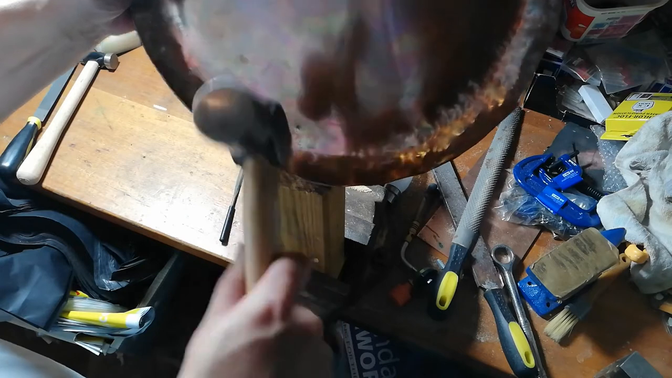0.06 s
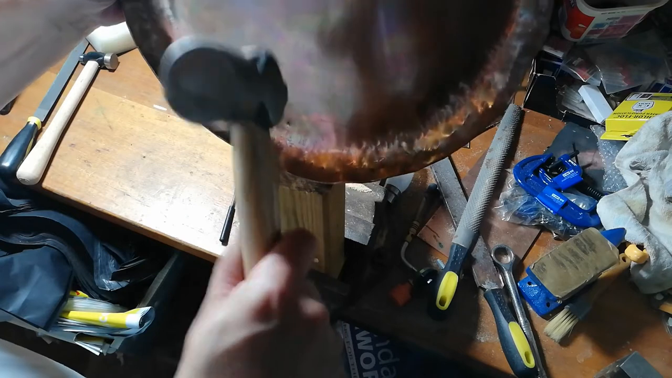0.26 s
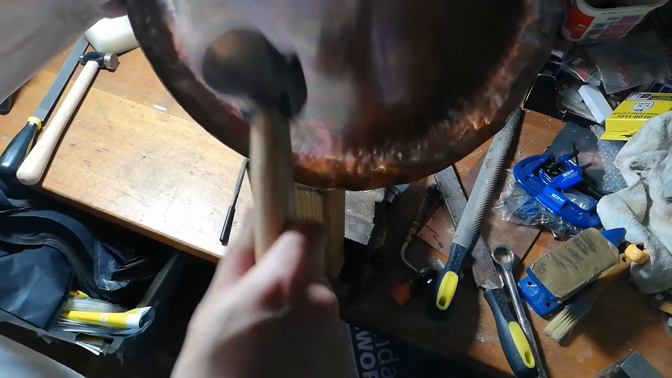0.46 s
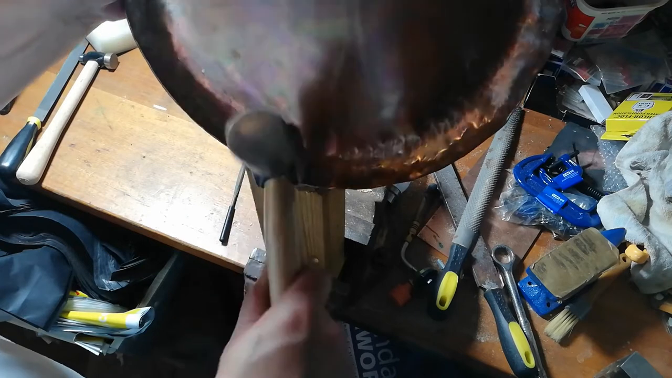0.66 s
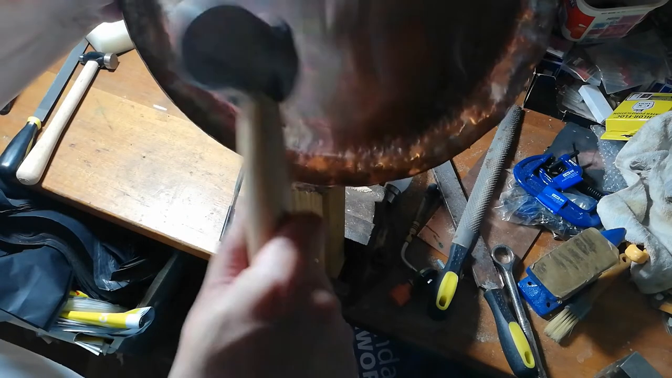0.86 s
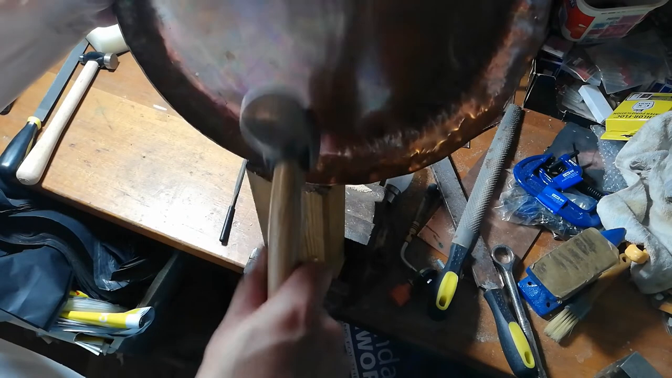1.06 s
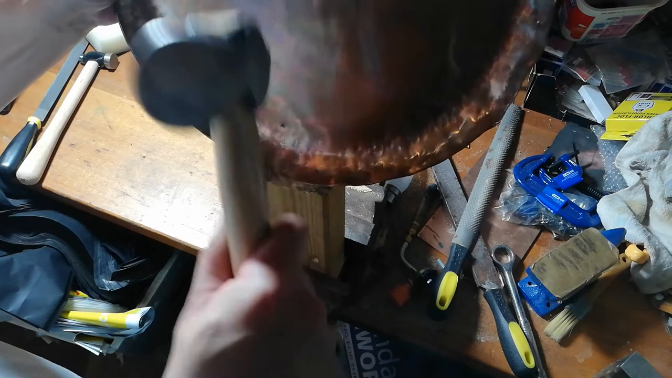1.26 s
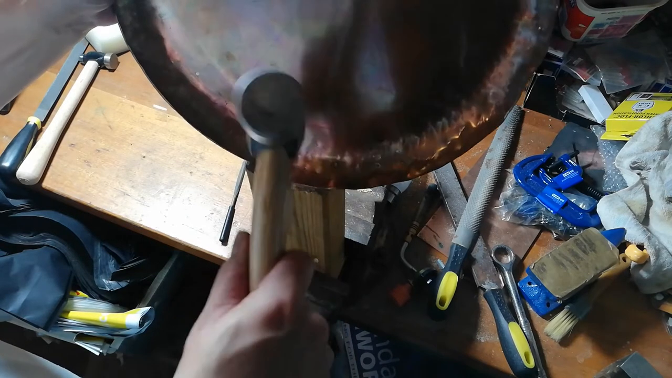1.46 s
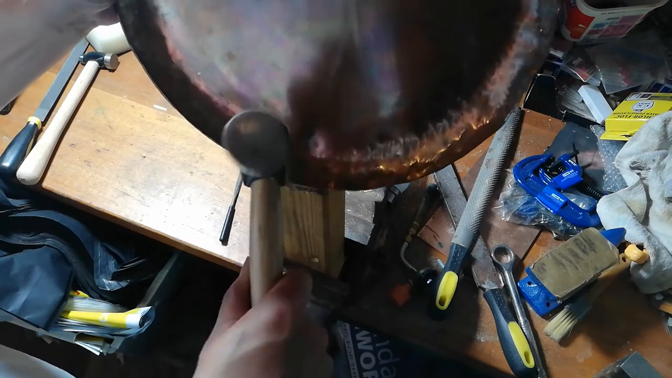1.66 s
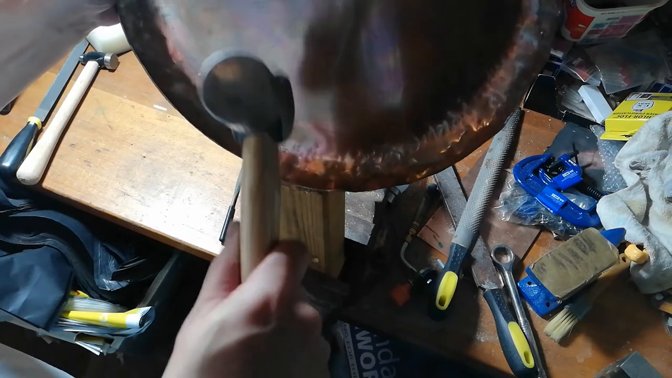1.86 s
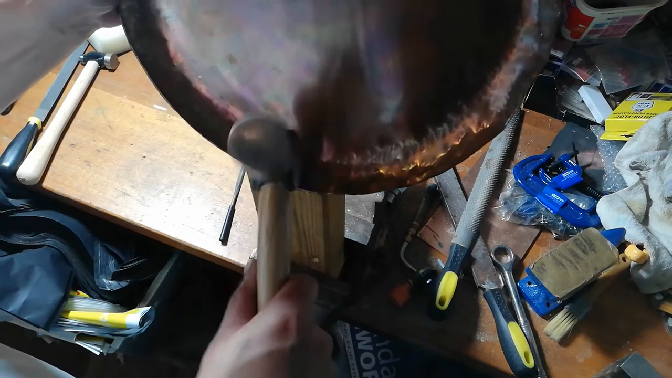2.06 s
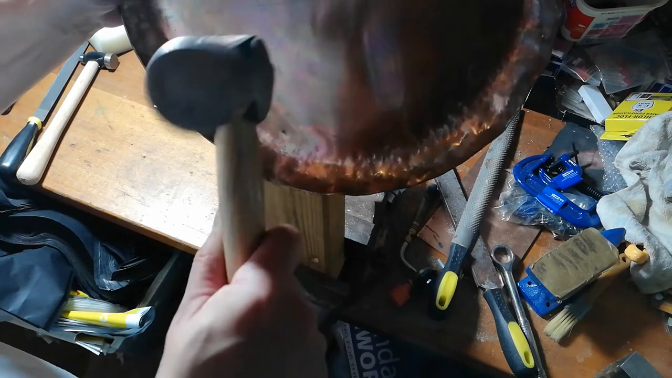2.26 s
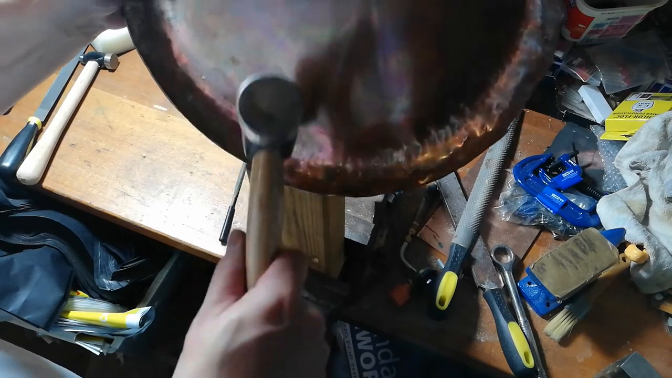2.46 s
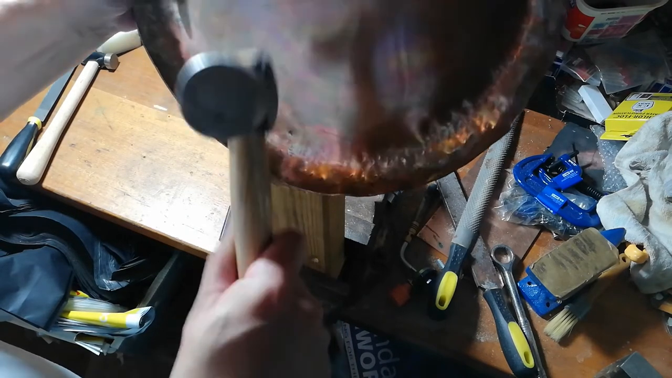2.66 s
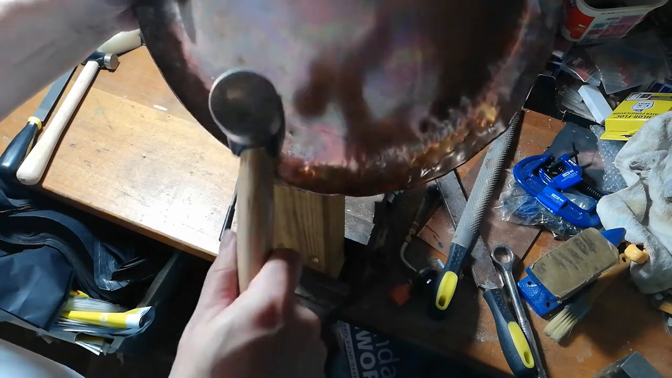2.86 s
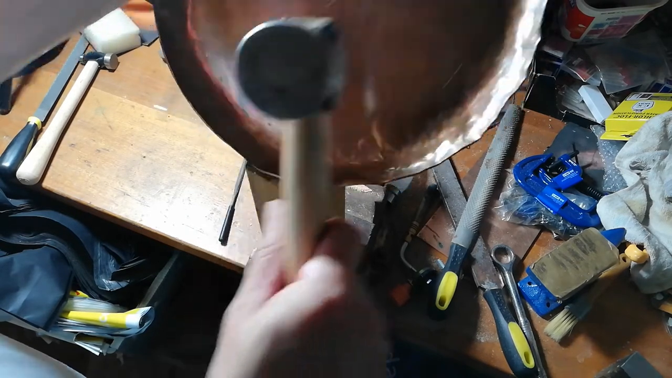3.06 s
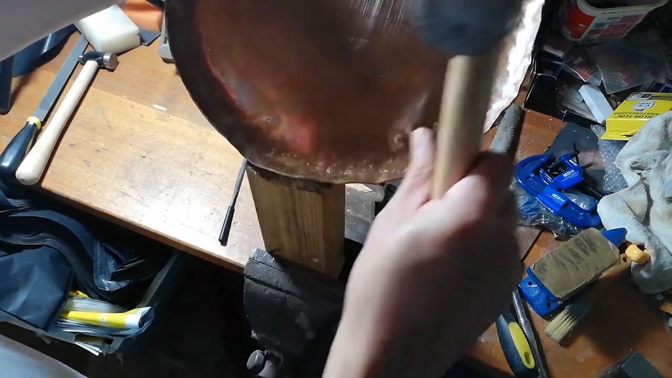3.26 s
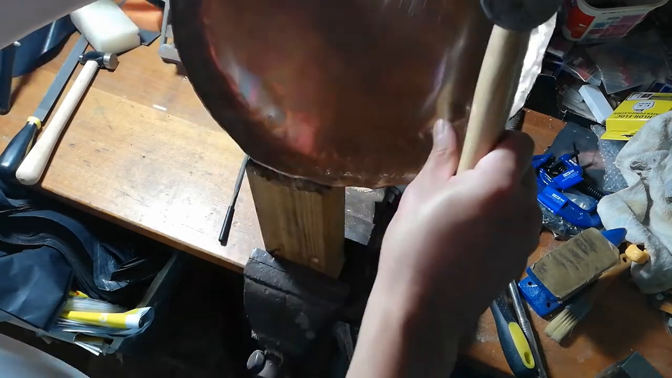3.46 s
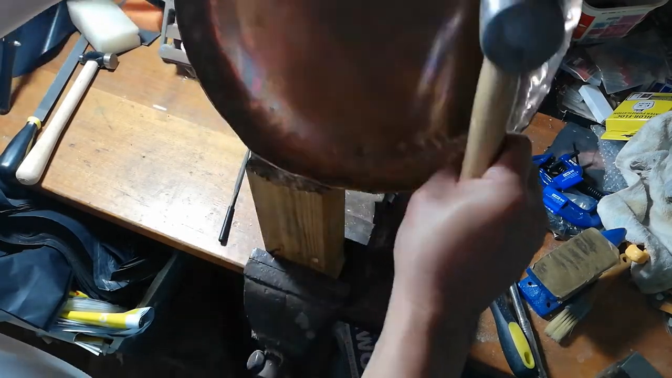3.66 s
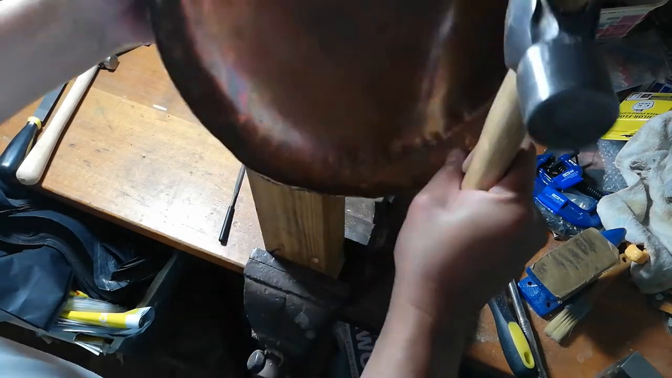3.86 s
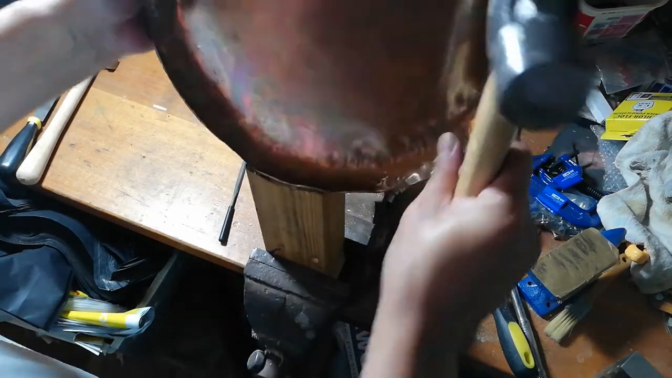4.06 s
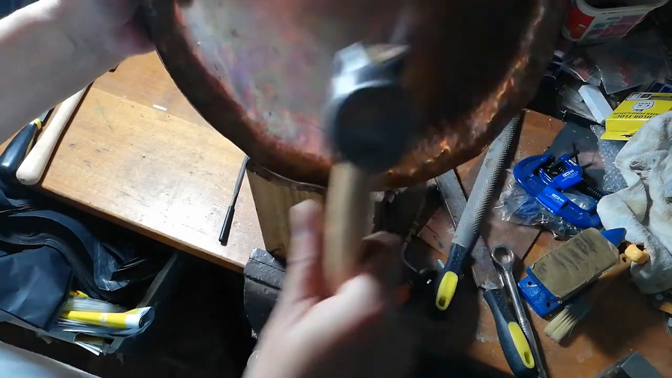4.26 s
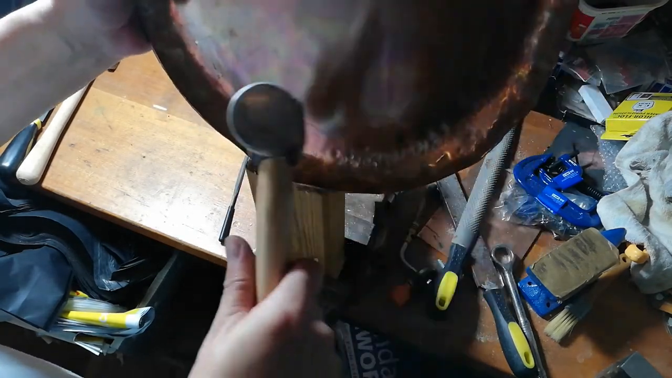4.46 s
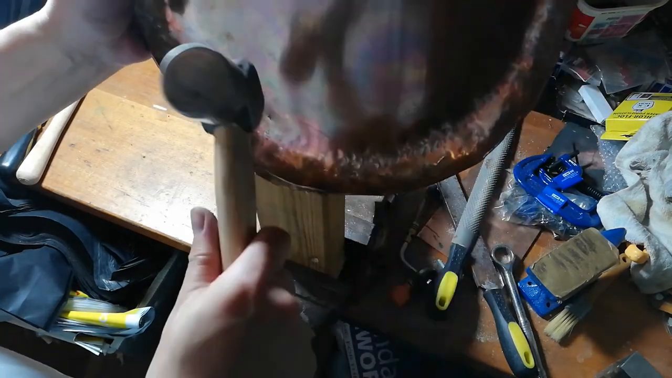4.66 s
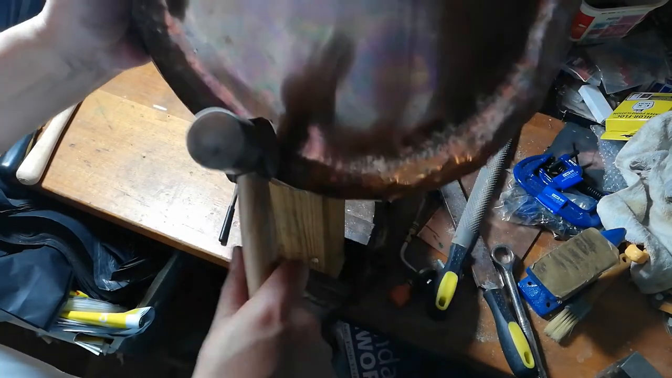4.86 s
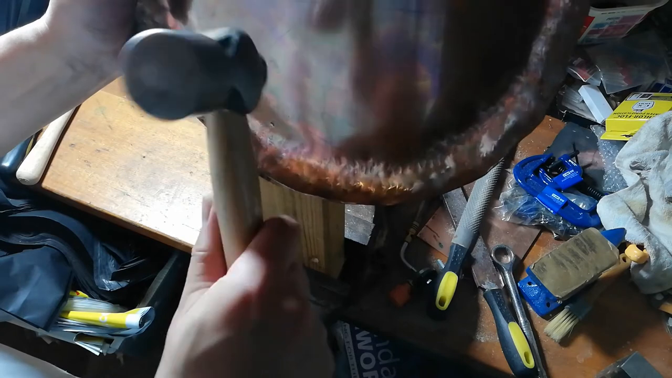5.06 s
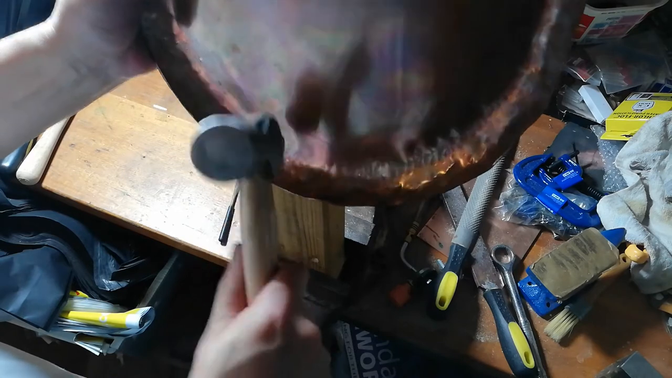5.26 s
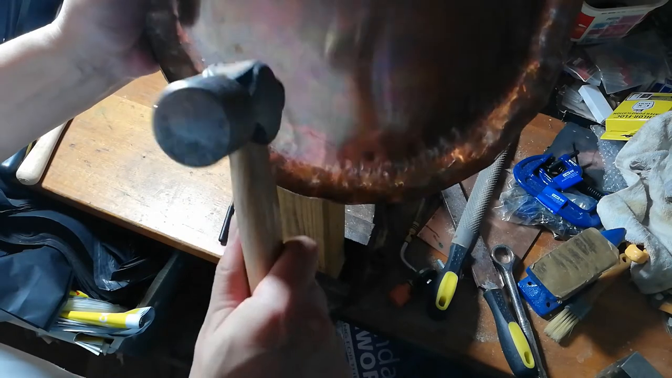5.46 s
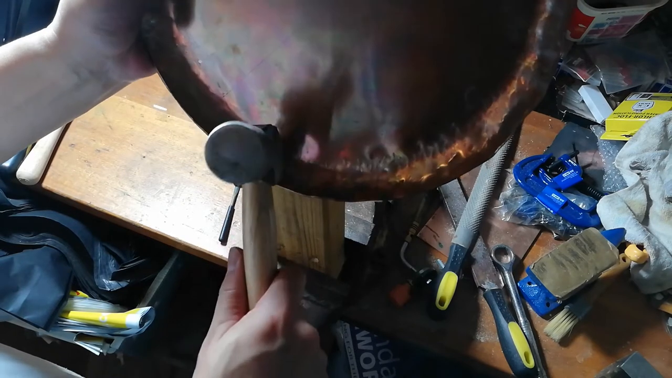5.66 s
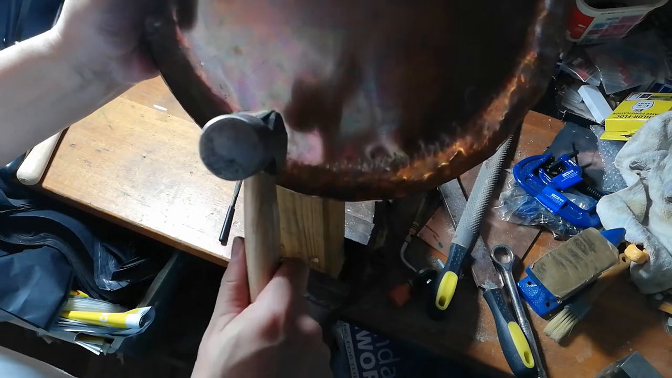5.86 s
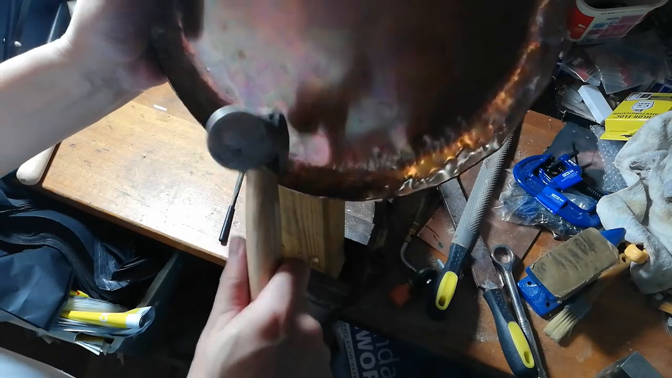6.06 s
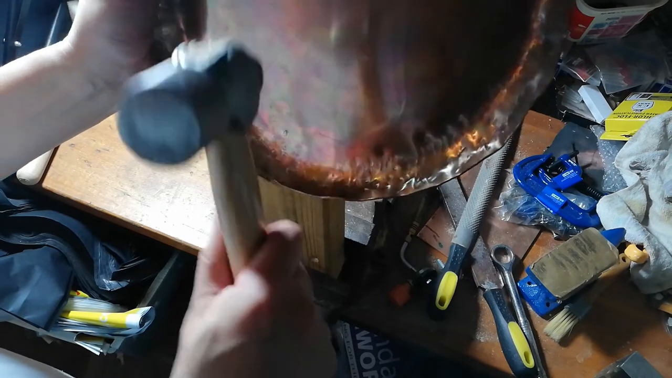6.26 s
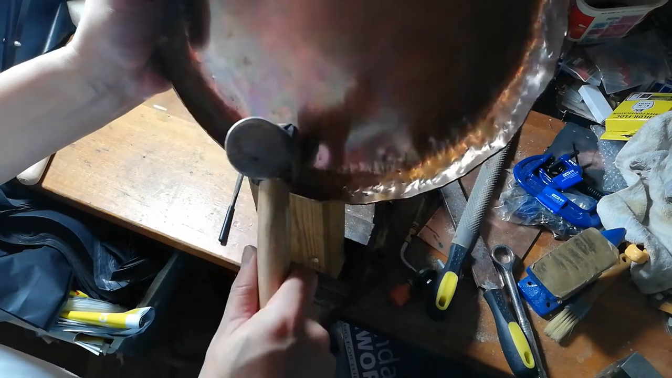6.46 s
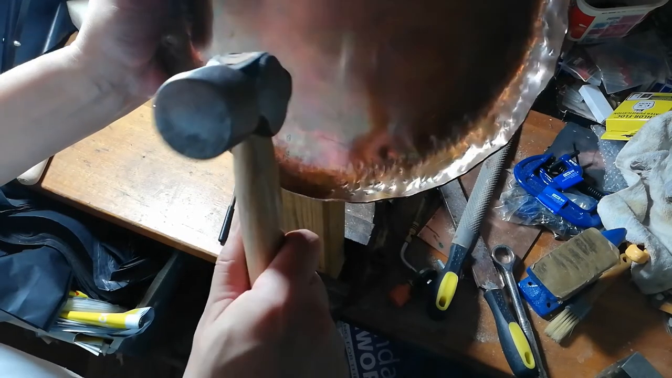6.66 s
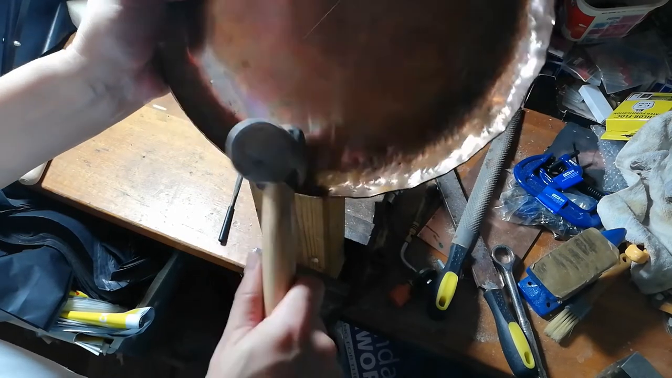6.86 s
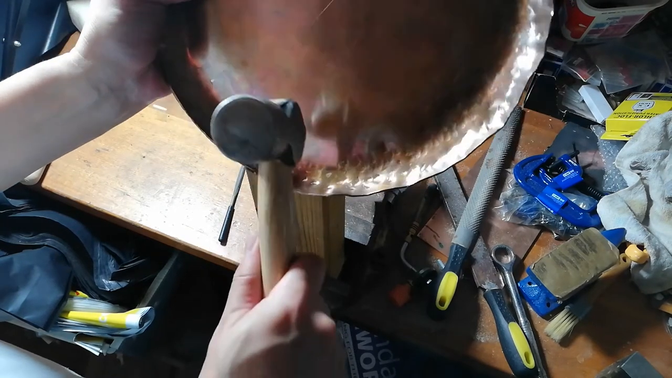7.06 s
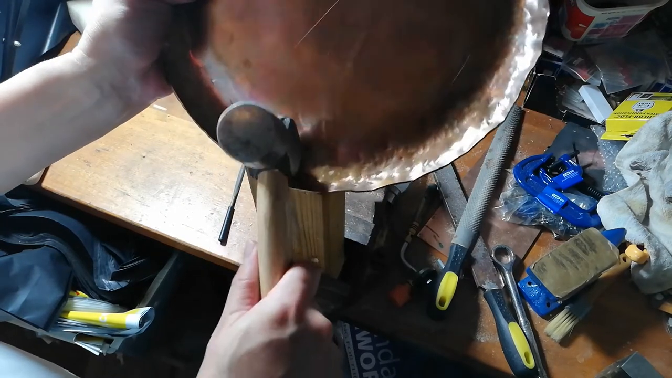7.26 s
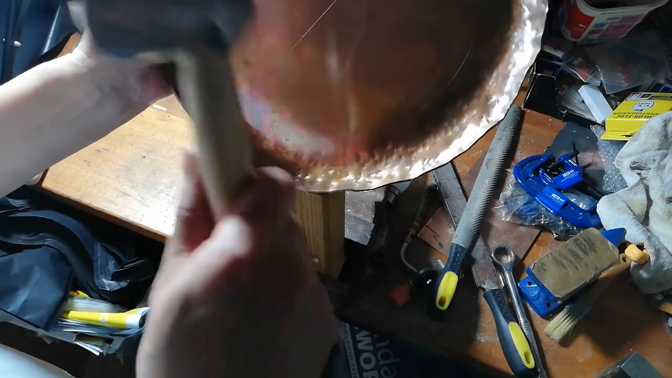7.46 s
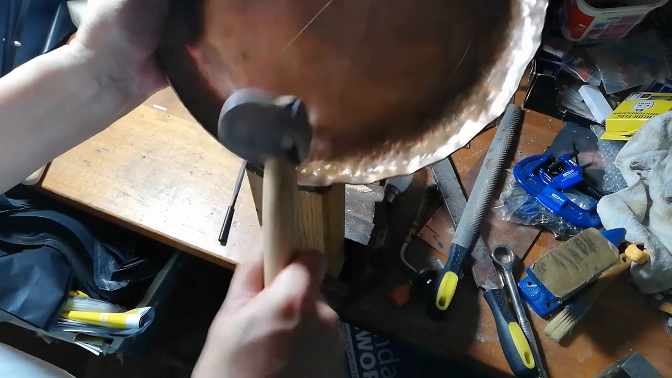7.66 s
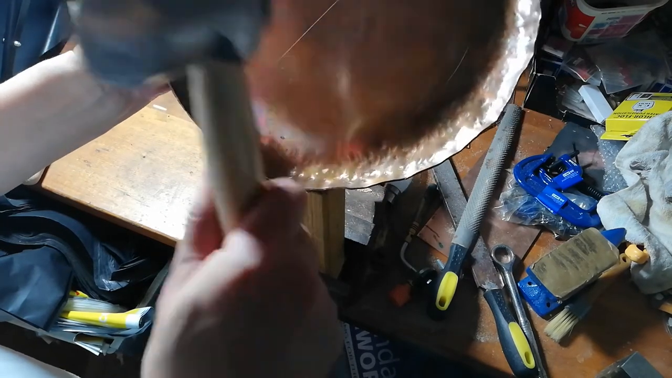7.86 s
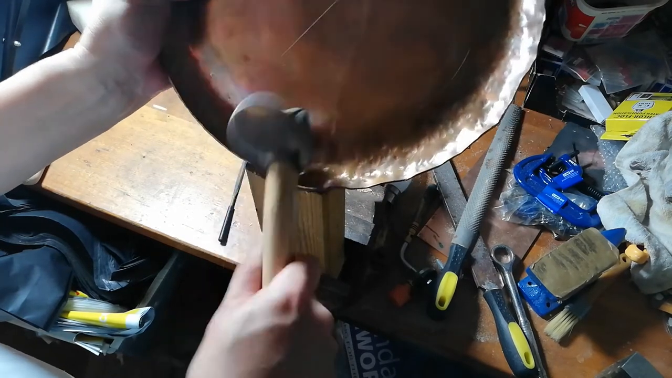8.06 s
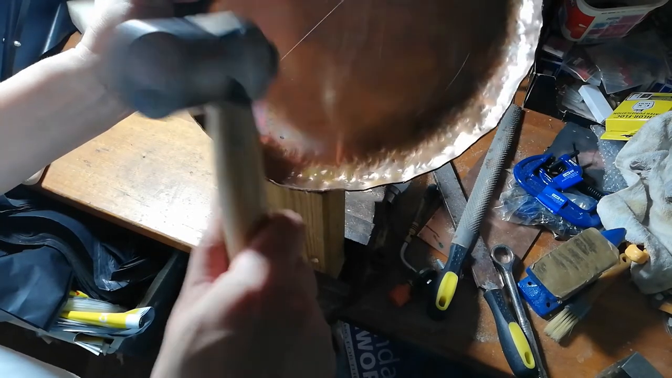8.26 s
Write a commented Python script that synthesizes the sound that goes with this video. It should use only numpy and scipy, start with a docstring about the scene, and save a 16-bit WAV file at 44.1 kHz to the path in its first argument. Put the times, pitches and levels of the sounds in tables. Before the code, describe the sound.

A steel hammer strikes a thin copper bowl over a wooden stake, three sharp ringing clangs a second, pausing midway before resuming.

```python
"""Copper bowl hammered over a stake

A steel hammer beats the rim of a hand-held copper bowl over a wooden stake, close by in a small workshop.
Each blow is dying noise for the crash of the sheet, and decaying sines for its ring, stake, bench and floor.
In the pause the turned bowl knocks softly, slides through the hand as rubbing noise and whistles faintly.
Noise echoes answer from the shop, two microphone ports hear bench and echoes, and rumble and hiss lie beneath."""
import sys
import numpy as np
from scipy import signal
from scipy.fft import rfft, irfft, next_fast_len
from scipy.io import wavfile
from scipy.ndimage import uniform_filter1d, minimum_filter1d

SR = 44100
rng = np.random.default_rng(int(sys.argv[2]) if len(sys.argv) > 2 else 0)


def log_audio(samples):
    """Write samples as a 16-bit WAV file to the path given in sys.argv[1]."""
    # one column per channel
    frames = np.atleast_2d(samples).T
    # limit to full scale, then quantise
    limited = np.clip(frames, -1, 1)
    pcm = np.round(limited * 32767).astype(np.int16)
    wavfile.write(sys.argv[1], SR, pcm)


N = 366912   # samples heard
RUN_IN = SR // 3   # samples ahead of the start, for a blow still dying away

# hammer blows and rebounds: (time [s], crash level [dB], its brightness [dB], ring level [dB],
# best-rung pitch [Hz], stake level [dB], floor boom level [dB], looseness of the grip [dB])
BLOWS = [(-0.27, -16, -5.5, -31.5, 1800, -31, -38.5, -5), (0.08, -10.5, -4, -26, 1480, -27.5, -35.5, -4.5),
         (0.429, -20.5, -8.5, -26, 993, -24.5, -35.5, -6), (0.772, -23, -4, -23, 1486, -24.5, -41, -2),
         (1.092, -13, -7.5, -31.5, 985, -31.5, -39.5, -9),
         (1.436, -16.5, -10.5, -24, 944, -24.5, -39.5, -14),
         (1.761, -14.5, -3, -24.5, 1776, -27.5, -39.5, -10),
         (2.078, -18.5, -4, -21.5, 916, -26.5, -40, -10.5),
         (2.438, -11.5, -4.5, -29, 1842, -28.5, -38.5, -2), (2.499, -26, -6.5, -38, 931, -46, -49.5, -12.5),
         (2.782, -15.5, 1, -27.5, 985, -28.5, -39.5, -12.5),
         (3.14, -14, -1.5, -27.5, 970, -28.5, -43, -6.5), (5.29, -14, -1.5, -30, 750, -29, -49.5, -1.5),
         (5.679, -10.5, -1.5, -26, 1890, -30, -38, -0.5), (6.109, -19.5, 0, -30.5, 1013, -31.5, -53, -3),
         (6.414, -21, -1, -31.5, 1816, -34.5, -57, -12.5), (6.806, -12, -6.5, -25, 1477, -20.5, -34.5, 0.5),
         (6.909, -40, -1, -40, 1470, -55, -50, -10.5), (7.358, -22, -5, -33.5, 1650, -36.5, -56, -2.5),
         (7.674, -21.5, -0.5, -27.5, 2460, -35, -50, 1.5), (8.059, -11.5, -1, -20.5, 761, -21, -38, 7.5),
         (8.129, -46.5, -3, -31.5, 1465, -35, -45.5, -12)]
# clear bowl modes: (pitch [Hz], relative level [dB], t60 before scaling [s])
BOWL = [(625, -4, .22), (763, -5, .16), (931, -1.5, .15), (994, -0.5, .17), (1140, -10, .2), (1395, -5, .2),
        (1486, -2, .22), (1761, -5, .26), (1838, -0.5, .19), (1892, -5, .12), (2172, -8, .16),
        (2420, -9, .12), (2652, -6, .25), (2772, -8, .2)]
# modes of the bench: (pitch [Hz], relative level [dB], t60 before scaling [s])
BENCH = [(112.6, -0.5, 0.16), (124, -4.5, 0.28)]
# modes of the wooden stake: (pitch [Hz], relative level [dB], t60 before scaling [s])
STAKE = [(171, -5.5, 0.16), (198.4, -4, 0.32), (338, -10.5, 0.39)]

CENTRES = np.arange(4.5, 14.6, .5)   # band centres [log2 Hz]
TURN_S = 4.0   # the bowl is turned and gripped anew
FAVOUR_DB, FAVOUR_OCTAVES = 9.5, .08   # gain at the best-rung pitch; reach of the favour


def from_db(db):
    """Decibels to gain."""
    return 10 ** (np.asarray(db) / 20)


def rms_one(x):
    """Scale to unit rms."""
    return x / np.sqrt(np.mean(x ** 2) + 1e-20)


def at_hz(points, hz):
    """Read a table on a log-frequency axis."""
    points = np.array(points)
    return np.interp(np.log(hz), np.log(points[:, 0] + 1), points[:, 1])


def dying(t60, size):
    """Envelope that falls 60 dB in t60 seconds."""
    return from_db(-60 * np.arange(size) / SR / t60)


def rings(modes, spread_db, sustain, size):
    """One strike on a body: every mode is a decaying sine with a strength and phase of its own."""
    hz, level_db, t60 = np.transpose(modes)[:, :, None]
    strength, phase = rng.standard_normal((2, len(modes), 1))
    t = np.arange(size) / SR
    envelope = from_db(level_db + spread_db * strength - 60 * t / (t60 * sustain))
    return np.sum(envelope * np.sin(2 * np.pi * hz * t + .5 * phase), axis=0)


def favour_db(hz, best_hz):
    """The struck spot rings modes near one pitch best."""
    return FAVOUR_DB * np.exp(-(np.log2(hz / best_hz) / FAVOUR_OCTAVES) ** 2)


def coloured(spectrum, size):
    """Frequencies, and the spectra of two noises of the given colour."""
    hz = np.arange(size // 2 + 1) * SR / size + 1
    return hz, rfft(rng.standard_normal((2, size))) * from_db(at_hz(spectrum, hz))


def dying_noise(hz, noise, t60s, factor, size):
    """Split noise into overlapping bands half an octave apart, each dying at its own pace."""
    share = np.clip(1 - 2 * np.abs(np.log2(hz) - CENTRES[:, None]), 0, 1)
    fades = dying(at_hz(t60s, 2 ** CENTRES)[:, None] * factor, size)
    return np.array([np.sum(irfft(share * one, size) * fades, axis=0) for one in noise])


def stereo(hz, noise, likeness):
    """Mix two noise spectra into left and right that are alike by the given share."""
    alike = np.clip(at_hz(likeness, hz), 0, 1)
    return np.sqrt(1 + alike) * noise[0] + np.sqrt(1 - alike) * noise[1] * [[1], [-1]]


def add(out, s, sound):
    """Mix a sound in at its time."""
    at = round(s * SR) + RUN_IN
    out[..., at:at + sound.shape[-1]] += sound[..., :out.shape[-1] - at]


def hush():
    """Low rumble of the building and microphone hiss: steady coloured noise."""
    # colour of rumble and hiss: (frequency [Hz], relative density [dB])
    hush_colour = [(13, -43.5), (24, -15.5), (60, -3), (110, -9.5), (200, -20), (400, -31.5), (1000, -31),
                   (2500, -33.5), (6000, -38), (10000, -39), (14000, -46.5), (16300, -53.5)]
    # (frequency [Hz], left-right likeness [0-1])
    hush_alike = [(30, 1), (200, 0.96), (600, 0.56), (3000, .2), (9000, 0.86)]
    level_db = -59.5   # rms
    size = next_fast_len(N)
    noise = irfft(stereo(*coloured(hush_colour, size), hush_alike), size)[:, :N]
    return from_db(level_db) * rms_one(noise)


def hammer():
    """Each blow: a crack and a crash of countless close sheet modes, the clear bowl modes, stake, bench and floor."""
    # colour of the crashing sheet: (frequency [Hz], relative density [dB])
    crash_colour = [(24, -34), (40, 0), (172, 7.5), (494, -2), (1570, 2.5), (1870, -1), (3180, -3.5),
                    (5120, -6), (5520, -8), (5960, -7.5), (9850, -3.5), (13300, -8), (15100, -22),
                    (16300, -33.5)]
    # decay of the crash: (frequency [Hz], t60 before scaling [s])
    crash_t60 = [(60, 0.93), (200, 0.38), (500, 0.4), (1000, 0.4), (2000, 0.32), (4000, 0.17),
                 (10000, 0.09), (16000, 0.11)]
    # likeness of the crash ahead of the ports: (frequency [Hz], left-right likeness [0-1])
    crash_alike = [(150, .97), (400, .6), (1000, 0.65), (3000, 0.37), (8000, 0.44)]
    # higher bowl modes: (pitch [Hz], relative level [dB], t60 before scaling [s])
    upper_modes = [(3014, -6.5, 0.29), (3460, -18.5, 0.084), (3820, -17.5, 0.073), (4260, -14, 0.33),
                   (3944, -12.5, .14), (4920, -14, 0.39), (5110, -10, 0.44)]
    # modes of the floor: (pitch [Hz], relative level [dB], t60 [s])
    floor_boom = [(36, 0, 0.17), (63.2, -2, 0.64)]
    crack_t60_s, linger_db = 0.055, -6   # decay of the crack; gain of the lingering crash
    sustain_at_0_db, sustain_per_db = 0.59, 0.0016   # decay factor; softer blows damp the sheet less
    mid_offset_db = -2   # mid crash against the mean of crash and ring
    bench_offset_db = (3, -1)   # bench against the mean of stake and floor, before and after the turn
    modes_db, modes_linger = -1, 1.28   # clear modes against the ring; they outlast the crash by this factor
    spread_db = 1.5
    out, size = np.zeros((2, N + RUN_IN)), 2 ** 14
    swell = 1 - dying(0.0022, size)   # the sheet takes a moment to fill with vibration
    fade = np.hanning(2 * size)[size:] ** 0.36
    for s, crash_db, bright_db, ring_db, best_hz, stake_db, boom_db, _ in BLOWS:
        mid_db = (crash_db + ring_db) / 2 + mid_offset_db
        bench_db = (stake_db + boom_db) / 2 + bench_offset_db[int(s > TURN_S)]
        top_db = crash_db + bright_db
        sustain = sustain_at_0_db - sustain_per_db * crash_db

        hz, noise = coloured(crash_colour, size)
        tilt = [(50, boom_db), (110, bench_db), (300, stake_db), (1200, ring_db),
                (4200, mid_db), (8500, crash_db), (13000, top_db)]
        noise = noise * from_db(at_hz(tilt, hz) + 16)
        noise = stereo(hz, noise, crash_alike)   # each port faces another part of the sheet
        # reversed in time, the same noise serves as a separate crack
        crack = irfft(noise, size)[:, ::-1] * dying(crack_t60_s, size)
        crash = from_db(linger_db) * dying_noise(hz, noise, crash_t60, sustain, size)

        favoured = [(f, db + favour_db(f, best_hz), t60) for f, db, t60 in BOWL]
        bowl = from_db(ring_db + modes_db) * rings(favoured, 2 * spread_db, modes_linger * sustain, size)
        bowl += from_db(mid_db - 3.5) * rings(upper_modes, 2 * spread_db, sustain, size)

        wood = from_db(boom_db + 6) * rings(floor_boom, spread_db, 1, size)
        wood += from_db(bench_db + 4.5) * rings(BENCH, spread_db, 0.82, size)
        wood += from_db(stake_db + 2.0) * rings(STAKE, spread_db, sustain, size)
        add(out, s, swell * (crack + crash + bowl + wood) * fade)
    return out


def rim_tone():
    """Clean, slowly dying loose modes, stopped when the hammer next clamps the rim or after a second."""
    # modes that the grip leaves loose, one list before and one after the turn:
    # (pitch [Hz], base rms level [dB], t60 before scaling [s], gain per dB of looseness [dB])
    loose_modes = [
        [(1466, -37, 0.45, 2), (1720, -51, .5, -0.3), (2180, -58, .8, -1.2), (2655, -46.5, 1, 0.46)],
        [(183, -58.5, .5, 3.5), (601, -55.5, .7, 2.1), (1311, -54, 0.51, -0.4), (1311, -41.5, 0.93, 1.44),
         (2200, -46, 0.43, 1.1)],
    ]
    favour_share, linger_per_db = 0.67, 0.64   # share of the favour; longer ringing per dB of looseness [dB]
    out, blows = np.zeros(N + RUN_IN), np.array(BLOWS)
    starts = blows[:, 0]
    struck = np.diff(starts, prepend=-1) > .2   # rebounds neither start nor stop them
    stops = [*starts[struck][1:], N / SR]
    for (s, _, _, _, best_hz, _, _, loose_db), stop in zip(blows[struck], stops):
        size = round(min(stop - s, 1) * SR)
        modes = [(hz, level_db + follows * loose_db + favour_share * favour_db(hz, best_hz), t60)
                 for hz, level_db, t60, follows in loose_modes[int(s > TURN_S)]]
        grow = 1 - dying(0.059, size)   # energy leaks in from the crash
        clamp = 1 - dying(.02, size)[::-1]
        tone = rings(modes, 0, from_db(linger_per_db * loose_db), size)
        add(out, s, np.sqrt(2) * grow * clamp * tone)   # root 2 turns rms into peak
    return out


def knocks():
    """The bowl set down softly on the stake: a scuffing contact wakes only the low modes."""
    # soft contacts: (time [s], relative level [dB], brightness [Hz], stake share [dB])
    contacts = [(3.541, -38, 1244, -1.5), (3.924, -69.5, 1100, -3.5), (4.085, -60.5, 1200, -8.5),
                (4.175, -43, 870, -1), (4.25, -47, 1140, -6), (4.453, -60, 1300, 1.5), (4.54, -48, 900, 9),
                (4.601, -56.5, 1013, -4), (4.644, -53, 1120, -10), (5.11, -64, 1800, -7),
                (7.34, -35.5, 693, 4.5), (7.594, -43.5, 393, 6)]
    top_hz, touch_t60_s = 1200, 0.11   # a soft touch wakes no bowl mode above; decay of the scuff
    out, size = np.zeros(N + RUN_IN), SR // 3
    low_modes = [mode for mode in BOWL if mode[0] < top_hz]
    fade = np.hanning(2 * size)[size:]
    for s, level_db, bright_hz, stake_db in contacts:
        body = rings(low_modes, 2.2, 1.0, size)
        body += from_db(stake_db) * rings(STAKE + BENCH, 3.5, .35, size)
        soft = signal.butter(4, bright_hz, fs=SR, output="sos")
        scuff = rng.standard_normal(size) * dying(touch_t60_s, size) * (1 - dying(.015, size))
        touch = signal.sosfilt(soft, scuff)
        sound = from_db(-29.5) * signal.fftconvolve(touch, body)[:size] + from_db(4.5) * touch
        add(out, s, from_db(level_db) * sound * fade)
    return out


def slide():
    """The bowl slips through the hand: bright rubbing noise swells, holds and fades with each slip."""
    # colour of skin on copper: (frequency [Hz], relative density [dB])
    rub_colour = [(1500, -35), (3000, -19), (5000, -11.5), (7000, -10), (9500, -1), (11500, -2.5),
                  (13500, -12.5), (16000, -17)]
    # slips: (start of hold [s], hold [s], rms level [dB])
    slips = [(3.933, 0.064, -64), (4.072, .03, -63.5), (4.117, 0.074, -59.5), (4.22, .03, -66),
             (4.255, 0.014, -54.5), (4.3, .05, -66.5), (4.452, .012, -67), (4.52, .035, -66),
             (4.579, 0.045, -75), (4.65, 0.0043, -57), (4.722, .008, -70), (5.114, .008, -68.5)]
    rise, fall = 899, 350.5   # dB per second
    peak_hz, peak_db = 45, 7   # the rubbed sheet answers in close peaks: their width and spread
    size = next_fast_len(N + RUN_IN)
    hz, (noise, _) = coloured(rub_colour, size)
    peaks = rms_one(uniform_filter1d(rng.standard_normal(len(hz)), size=round(peak_hz * size / SR)))
    rub = irfft(noise * from_db(peak_db * peaks), size)[:N + RUN_IN]
    t = (np.arange(N + RUN_IN) - RUN_IN) / SR
    power = np.zeros(N + RUN_IN)
    for s, hold, level_db in slips:
        before, after = np.maximum(s - t, 0), np.maximum(t - s - hold, 0)
        power += from_db(level_db - rise * before - fall * after) ** 2
    return np.sqrt(power) * rms_one(rub)


def whistle():
    """A faint thin whistle that arches and sags: two gliding sine lines."""
    # glide of the lower line, level of each: (time [s], pitch [Hz], rms level [dB])
    glide = [(4.77, 6300, -105), (4.81, 6650, -83), (4.86, 6250, -87), (4.92, 5900, -78.5),
             (4.985, 5800, -82), (5.0, 5750, -105)]
    upper_ratio = 1.645   # pitch of the second line against the first
    s, hz, level_db = np.transpose(glide)
    t = np.arange(N + RUN_IN) / SR - RUN_IN / SR
    phase = 2 * np.pi * np.cumsum(np.interp(t, s, hz)) / SR
    level = from_db(np.interp(t, s, level_db, left=-140, right=-140))
    return np.sqrt(2) * level * (np.sin(phase) + np.sin(upper_ratio * phase))


def shop(x):
    """Diffuse noise echoes, each band dying at its own pace, partly other ones for left and right."""
    # colour of the echoes: (frequency [Hz], relative level [dB])
    shop_colour = [(60, -0.5), (300, -3.5), (600, -7.5), (1900, -6), (4000, -2), (9000, -4), (16000, -1)]
    # decay of the room: (frequency [Hz], t60 before scaling [s])
    shop_t60 = [(60, 0.81), (250, 0.95), (1000, 0.75), (4000, 0.76), (9000, 0.6), (16000, 0.48)]
    # likeness ahead of the ports: (frequency [Hz], left-right likeness [0-1])
    shop_alike = [(60, 1), (150, 1), (400, 1), (2000, 0.24), (5000, 0.43), (9000, 1)]
    size = 2 ** 15
    hz, noise = coloured(shop_colour, size)
    echoes = dying_noise(hz, stereo(hz, noise, shop_alike), shop_t60, 0.84, size)
    echoes = echoes * (1 - dying(0.051, size))   # reflections build up
    echoes = echoes / np.sqrt(np.sum(echoes ** 2) / 2)
    return signal.fftconvolve(x[None], echoes, axes=1)[:, :len(x)]


def ports(x):
    """Two microphone ports hear the bench sounds and their echoes, with level and phase offsets by pitch."""
    # how strongly the ports differ: (frequency [Hz], side against mid before an offset [dB])
    side_share = [(60, -20), (110, -19), (200, -14), (380, 0.5), (700, 7.5), (1290, -5.5), (2380, 3),
                  (4400, 5), (8120, -6), (15000, -11)]
    # balance: (frequency [Hz], left louder than right by [dB])
    left_louder = [(60, -0.5), (110, 1), (200, -1), (380, 1.5), (700, 1.5), (1290, -0.5), (2380, -0.5),
                   (4400, 0.5), (8120, -1.5), (15000, -5.5)]
    size = next_fast_len(N + 4096)
    hz = np.arange(size // 2 + 1) * SR / size + 1
    turn = 1j * from_db(at_hz(side_share, hz) - 3.5)   # a quarter turn of phase, opposite in each port
    half = from_db(at_hz(left_louder, hz) / 2)
    response = np.array([half * (1 + turn), (1 - turn) / half])
    return irfft(rfft(x, size) * response, size)[:, :N]


def scene():
    """Bench sounds, their echoes and the quiet of the room."""
    bench = hammer() + rim_tone() + knocks() + slide() + whistle()
    heard = bench + from_db(-12) * shop(bench.mean(axis=0))
    return ports(heard[:, RUN_IN:]) + hush()


def record(dry):
    """Look-ahead gain reduction ducks the loudest peaks, the top is cut, overs are clipped."""
    cutoff_hz = 16500
    over_db = np.maximum(20 * np.log10(np.abs(dry).max(axis=0) + 1e-9) + 1.6, 0)   # excess above -1.6 dB
    fall = 350.0 * np.arange(N) / SR   # the held excess falls by 350 dB per second
    held_db = np.maximum.accumulate(over_db + fall) - fall
    ahead_db = -minimum_filter1d(-held_db, size=301)
    limited = dry * from_db(-.6 * uniform_filter1d(ahead_db, size=151))   # takes off 60 % of the excess
    top_cut = signal.cheby2(12, 60, cutoff_hz, fs=SR, output="sos")
    return np.clip(signal.sosfilt(top_cut, limited), -1, 1)


dry = scene()
out = record(dry)
log_audio(out)
```